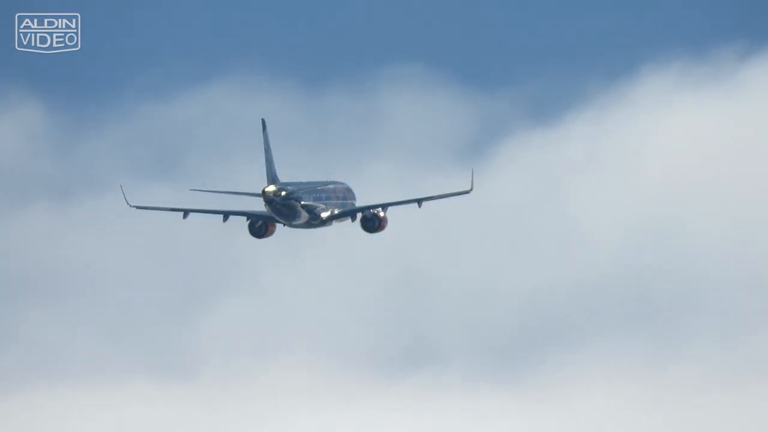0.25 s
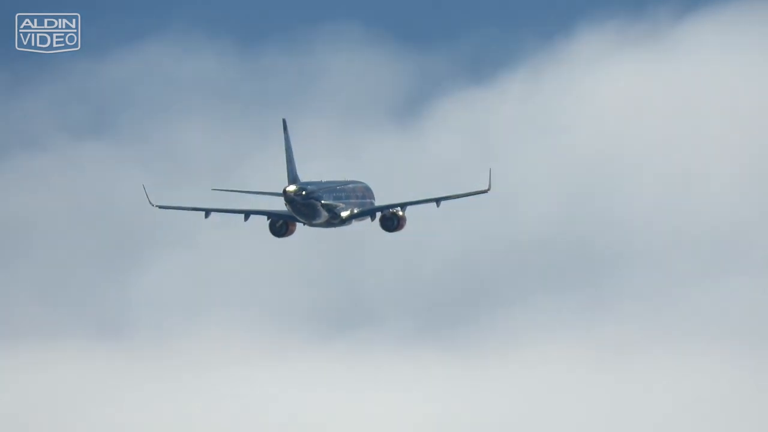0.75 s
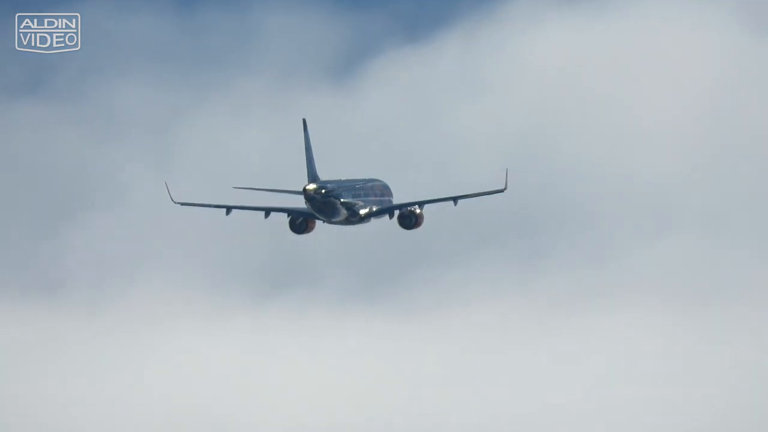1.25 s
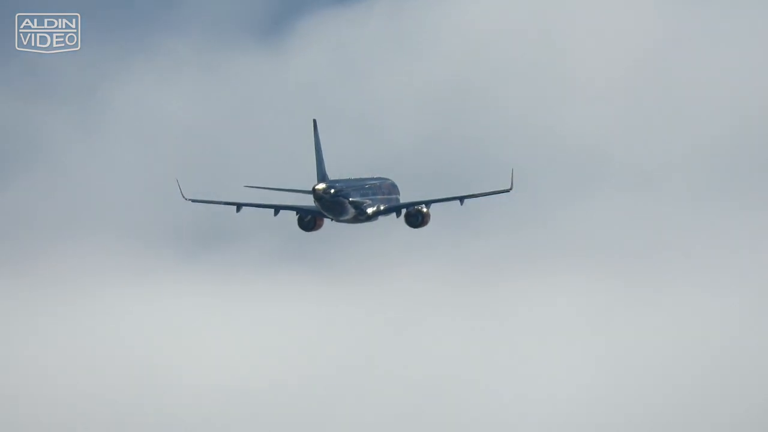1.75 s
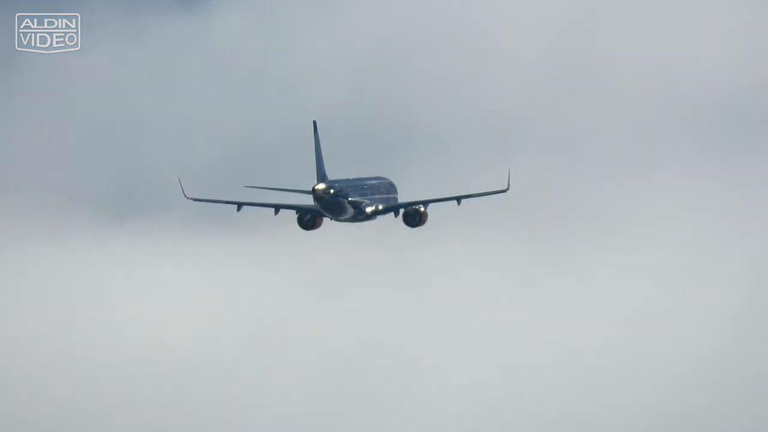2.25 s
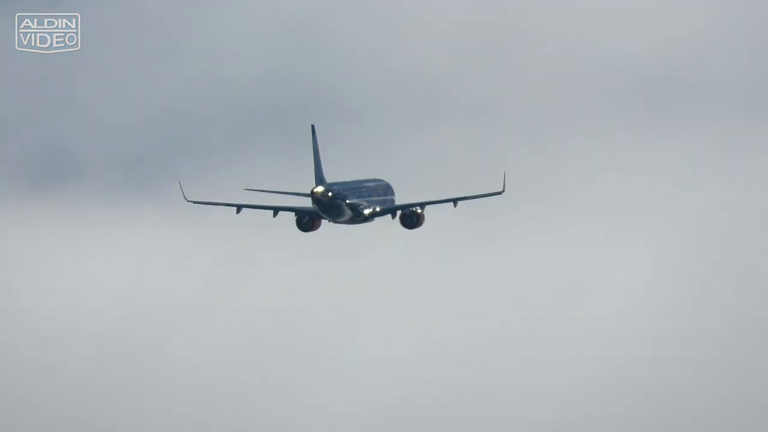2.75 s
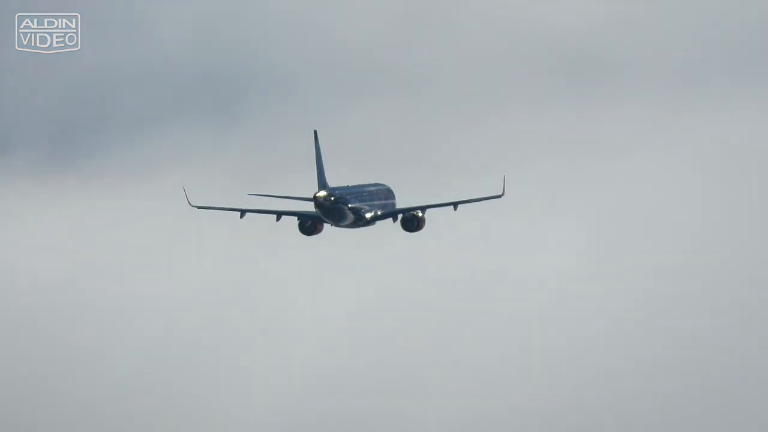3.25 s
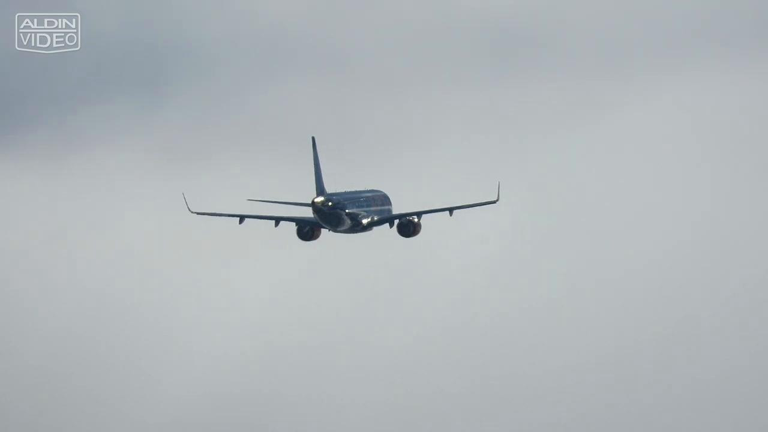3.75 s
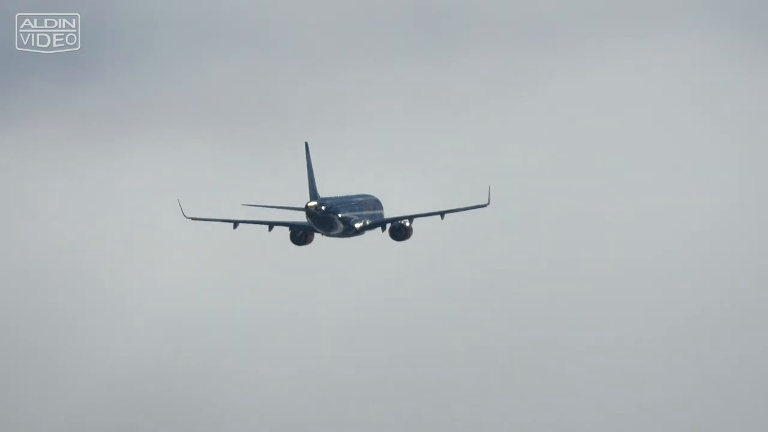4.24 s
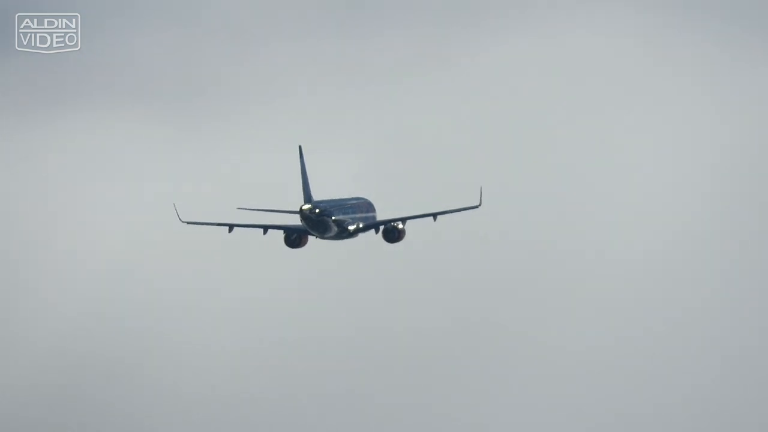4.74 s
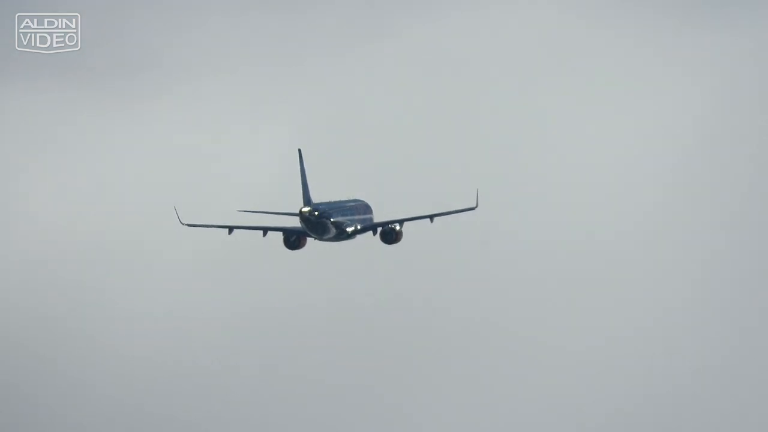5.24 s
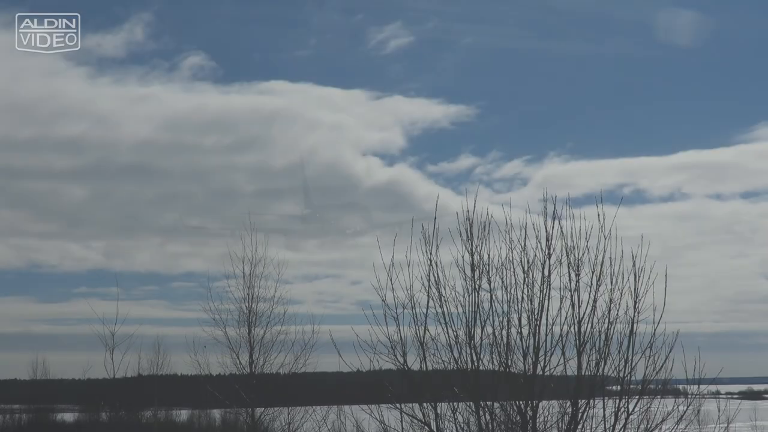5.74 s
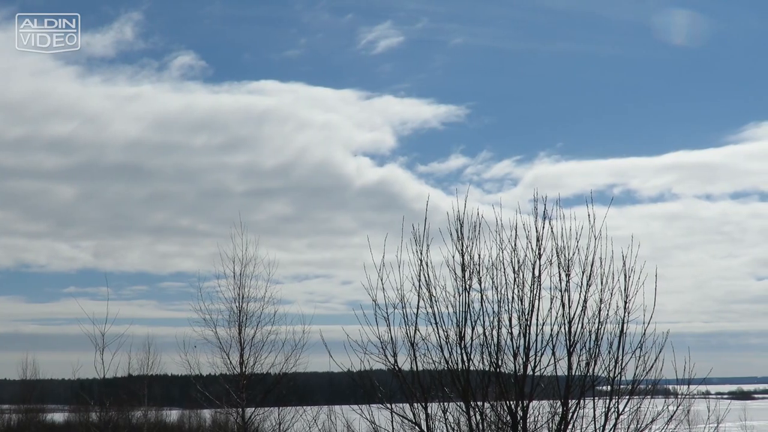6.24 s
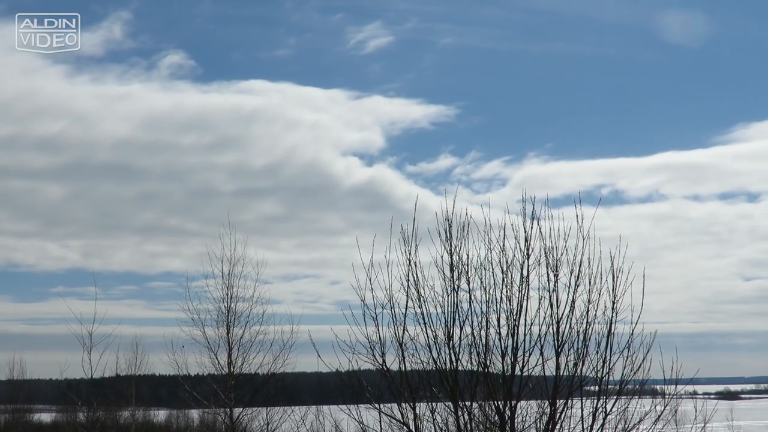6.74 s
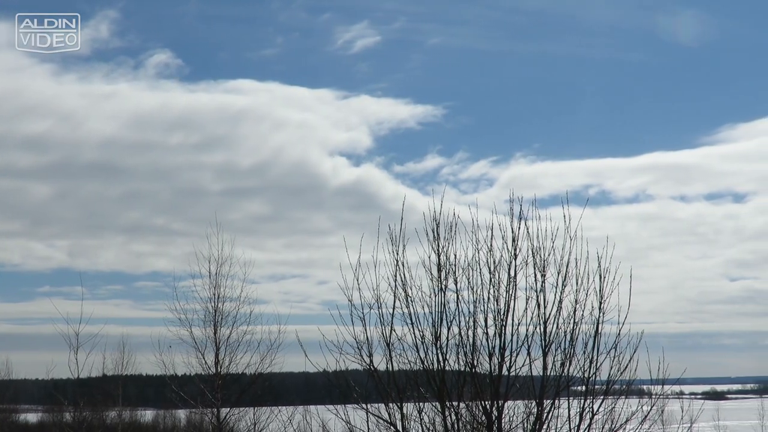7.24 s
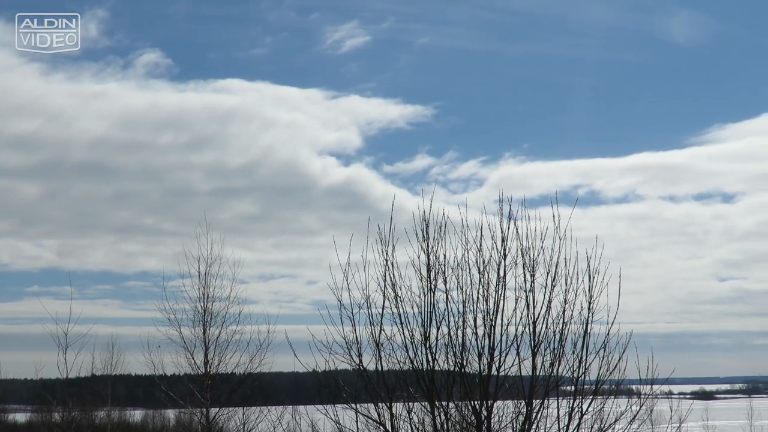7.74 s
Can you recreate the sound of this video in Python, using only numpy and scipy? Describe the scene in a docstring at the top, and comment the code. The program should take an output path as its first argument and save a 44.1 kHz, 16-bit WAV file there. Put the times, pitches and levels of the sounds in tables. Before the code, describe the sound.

A departing jet airliner's low, muffled exhaust roar swells around one second, throbs with a deep hum, then fades unevenly to a duller distant rumble.

```python
"""A jet airliner's exhaust roar swells and fades through restless air as it climbs away outdoors.
Shortly before 6 s the near roar dissolves into a duller, more distant one.
Two close low tones hum and beat within it, over faint whines, a whistle, ticks and microphone hiss.
The roar is shaped noise in three bands, its surges and fan whine are moving bands of noise,
the hum and whistle are wavering sines, and the ticks are short bursts of bright noise."""
import sys
import numpy as np
from scipy import signal
from scipy.fft import rfft, irfft
from scipy.io import wavfile

SR = 44100
rng = np.random.default_rng(int(sys.argv[2]) if len(sys.argv) > 2 else 0)


def waveform_to_disk(signal):
    """Save audio, clipped to [-1, 1], as 16-bit WAV at the path in sys.argv[1]."""
    frames = np.transpose(np.atleast_2d(signal))
    scaled = np.clip(frames, -1, 1) * 32767
    samples = np.round(scaled).astype(np.int16)
    wavfile.write(sys.argv[1], SR, samples)


N = 352359
TIME = np.arange(N) / SR  # s
BINS = np.fft.rfftfreq(N, 1 / SR)  # Hz


def gain_of(db):
    """Decibels to amplitude."""
    return 10 ** (np.asarray(db) / 20)


def evened(x):
    """Scales to rms 1."""
    return x / np.sqrt(np.mean(x ** 2) + 1e-20)


def read(points):
    """Reads a table of (Hz, dB) on every frequency bin, along a logarithmic pitch axis."""
    hz, db = np.transpose(points)
    return np.interp(np.log(BINS + 1), np.log(hz + 1), db)


def curves(rows):
    """Reads each column of a time table on every sample."""
    seconds, *columns = np.transpose(rows)
    return [np.interp(TIME, seconds, column) for column in columns]


def noise(gain):
    """Noise of rms 1 with the given amplitude spectrum."""
    white = rfft(rng.standard_normal(N))
    return evened(irfft(white * gain, N))


def drift(hz):
    """Slow chance movement of rms 1, up to about hz."""
    return noise(np.exp(-(BINS / hz) ** 2))


def slow(hz):
    """Slow chance movement of rms 1, up to about hz, drawn every 5 ms and joined by lines."""
    steps = np.arange(0, N / SR + 0.01, 0.005)
    rates = np.fft.rfftfreq(len(steps), steps[1])
    white = rfft(rng.standard_normal(len(steps)))
    movement = irfft(white * np.exp(-(rates / hz) ** 2), len(steps))
    return np.interp(TIME, steps, evened(movement))


def steadied(x, seconds):
    """Takes the slow swells out of a noise, leaving its fast grain."""
    window = signal.windows.hann(int(seconds * SR))
    energy = signal.fftconvolve(x ** 2, window, "same")
    weight = signal.fftconvolve(np.ones(N), window, "same")  # smaller near the ends
    return x / np.sqrt(np.maximum(energy / weight, 1e-9))


def below(hz, order=8):
    """A soft crossover, falling from 1 to 0 around hz."""
    return 1 / (1 + (BINS / hz) ** order)


def swell(peak_s, rise_s, fall_s):
    """A bell-shaped envelope of height 1."""
    half_s = np.where(TIME < peak_s, rise_s, fall_s)
    return np.exp(-((TIME - peak_s) / half_s) ** 2)


def band(hz, width_hz):
    """An even band of noise whose centre follows hz."""
    turn = np.exp(2j * np.pi * np.cumsum(hz) / SR)
    grain = drift(width_hz / 2) + 1j * drift(width_hz / 2)
    return steadied((grain * turn).real, 0.9)


def wavering(hz, waver_db, wander_turns):
    """One tone of mean pitch hz that wavers a little in strength and pitch."""
    turns = hz * TIME + wander_turns * slow(3.5)
    return np.sqrt(2) * np.sin(2 * np.pi * turns) * gain_of(waver_db * slow(11))


# humps and hollows of the roar, near and far: centre [Hz], width [Hz], height [dB]
ROAR_COLOUR = [(100.4, 6.4, 2.5), (142, 16.5, -6), (190.6, 15, -9.5), (220, 11, 2), (259, 12, 4),
               (374, 49, -0.5), (484, 73, 0.5), (650, 21, -1)]
RUMBLE_FLUTTER_DB = 1.0  # the large eddies arrive in lumps
RASP_FLUTTER_DB = 0.74


def exhaust(spectrum, rumble_db, roar_db, rasp_db, roar_flutter_db):
    """Turbulent mixing noise: large eddies rumble, middle ones roar and small ones rasp."""
    colour_db = sum(db * np.exp(-(2 * (BINS - hz) / width) ** 2) for hz, width, db in ROAR_COLOUR)
    shape = gain_of(read(spectrum) + colour_db)
    shape = shape * below(1950, order=14)  # the air absorbs the treble
    low, high = below(148.0), 1 - below(648)
    middle = (1 - low) * (1 - high)
    # the shares are of power, hence the roots
    rumble = steadied(noise(shape * np.sqrt(low)), 0.18)
    roar = steadied(noise(shape * np.sqrt(middle)), 0.18)
    rasp = steadied(noise(shape * np.sqrt(high)), 0.18)
    flutter = slow(7.8)  # shared by roar and rasp
    rumble = rumble * gain_of(rumble_db + RUMBLE_FLUTTER_DB * slow(30))
    roar = roar * gain_of(roar_db + roar_flutter_db * flutter)
    rasp = rasp * gain_of(rasp_db + RASP_FLUTTER_DB * flutter)
    return rumble + roar + rasp


# strength of the near roar as the jet draws away, before the trims below:
# start_s [s], roar_db [dB], deep rumble_db [dB], upper rasp_db [dB]
NEAR_LEVELS = [(0, -35.5, -33, -43), (0.15, -34.5, -39.5, -45.5), (0.56, -28.5, -36, -40.5),
               (0.78, -26.5, -34.5, -43), (1.05, -27, -35.5, -39), (1.6, -29.5, -35.5, -45),
               (2.1, -31, -37.5, -45.5), (2.65, -31.5, -40, -42), (3.1, -34, -39.0, -46.5),
               (3.6, -36.0, -36.5, -47.0), (4.5, -34, -38.5, -45), (5.0, -34.5, -40, -46),
               (5.5, -35.5, -38.5, -44.5)]
# relative spectrum of the near roar: pitch_hz [Hz], level_db [dB per Hz]
NEAR_SPECTRUM = [(13, -60), (22, -41), (46, -20.5), (75, -9.5), (139, -11.5), (178, -4), (192, 0),
                 (218, -4.5), (311, -7), (361, -13), (505, -10), (609, -18.5), (707, -19.5), (1110, -30.5),
                 (1900, -48.5), (2470, -78), (4180, -120)]
RUMBLE_TRIM_DB, ROAR_TRIM_DB, RASP_TRIM_DB = 0.5, 0.33, 2.28


def near_roar():
    """Exhaust noise that swells, then fades as the jet draws away."""
    roar_db, rumble_db, rasp_db = curves(NEAR_LEVELS)
    return exhaust(NEAR_SPECTRUM, rumble_db + RUMBLE_TRIM_DB, roar_db + ROAR_TRIM_DB,
                   rasp_db + RASP_TRIM_DB, roar_flutter_db=0.64)


# faint electronic tones: pitch_hz [Hz], level_db [dB rms]
STEADY_WHINES = [(4436, -82), (13426, -77)]


def steady_whines():
    """Thin electronic sines of constant level, wandering very slightly in phase."""
    total = np.zeros(N)
    for hz, db in STEADY_WHINES:
        turns = hz * TIME + 0.04 * slow(3)
        total += np.sqrt(2) * gain_of(db) * np.sin(2 * np.pi * turns)
    return total


# relative spectrum of the microphone hiss: pitch_hz [Hz], level_db [dB per Hz]
HISS_SPECTRUM = [(30, -1), (300, 15.5), (1000, 6), (2000, 3), (4000, 0.5), (8000, -1), (15500, -0.5)]
HISS_DB = -50.5  # of each microphone, before they mix


def hiss(opposed=0.046):
    """Self-noise of two microphones; stereo widening feeds a little of each into the other, inverted."""
    pair = np.array([noise(gain_of(read(HISS_SPECTRUM))) for _ in range(2)])
    return gain_of(HISS_DB) * (pair - opposed * pair[::-1])


# swells of a thin whistle, before its waver: peak_s [s], level_db [dB rms], rise_s [s], fall_s [s]
WHISTLE_SWELLS = [(.7, -66.5, 1.3, .8), (5.2, -68.5, 0.79, .6), (7.4, -70, 0.74, 0.8)]
WHISTLE_HZ = 1578


def whistle():
    """One wavering sine that comes and goes."""
    strength = sum(gain_of(db) * swell(s, rise, fall) for s, db, rise, fall in WHISTLE_SWELLS)
    return strength * wavering(WHISTLE_HZ, waver_db=2.5, wander_turns=0.055)


# swells of the low hum, before its waver: peak_s [s], pitch_hz [Hz], level_db [dB rms],
# rise_s [s], fall_s [s], waver_db [dB rms, either sign]
HUM_SWELLS = [(.55, 192, -31.5, 0.3, 0.13, 4), (.57, 178.7, -32.5, 0.36, .16, -1),
              (1.13, 191.8, -26, 0.38, 0.37, 2.6), (1.6, 180.4, -35, .6, 0.69, 2),
              (3.0, 193.1, -33.5, 0.4, 0.74, 1.9), (4.6, 179.5, -42, .45, .5, 7),
              (5.4, 192.5, -36.5, 0.32, 0.35, 2.2), (7.15, 191.4, -38.5, 1.52, 0.41, 0.3),
              (7.95, 191.4, -42, 0.14, .12, -1)]


def hum():
    """Two low tones about 13 Hz apart swell and ebb, throbbing where they overlap."""
    total = np.zeros(N)
    for s, hz, db, rise, fall, waver_db in HUM_SWELLS:
        total += wavering(hz, waver_db, wander_turns=0.067) * gain_of(db) * swell(s, rise, fall)
    return total


# bands that swell out of the roar as the air and the angle change:
# peak_s [s], pitch_hz at the peak [Hz], level_db [dB rms], half_length_s [s], width_hz [Hz]
SURGE_BANDS = [(0.567, 260, -30, 0.13, 150), (1.08, 409.2, -33.5, .25, 233), (2.352, 520, -42, 0.2, 140),
               (2.65, 722, -41, 0.32, 259), (4.552, 290.4, -40, 0.15, 130), (4.598, 547, -48, 0.3, 210),
               (5.1, 300, -40.5, 0.096, 160), (5.5, 429.8, -41, 0.27, 260), (6.7, 265, -46.5, 0.62, 110)]
SURGE_SAG_OCTAVES_PER_S = 0.45


def surges():
    """Bands of noise that swell and pass, each sliding down in pitch."""
    total = np.zeros(N)
    for s, hz, db, half, width in SURGE_BANDS:
        centre_hz = hz * 2 ** (-SURGE_SAG_OCTAVES_PER_S * (TIME - s))
        total += band(centre_hz, width) * gain_of(db) * swell(s, half, half)
    return total


# pitch and level are those at the start, before the sag and the fade
FAN_START_S, FAN_RISE_S, FAN_HZ, FAN_SAG_HZ_PER_S, FAN_WIDTH_HZ = 1.9, 0.22, 1688, 16, 91
FAN_DB, FAN_FADE_DB_PER_S = -66.5, 1


def fans():
    """The blurred fan whine enters as the jet turns its tail, and sinks with the Doppler shift."""
    age = TIME - FAN_START_S
    whine = band(FAN_HZ - FAN_SAG_HZ_PER_S * age, FAN_WIDTH_HZ)
    rise = np.clip(age / FAN_RISE_S, 0, 1)
    return whine * rise * gain_of(FAN_DB - FAN_FADE_DB_PER_S * age)


# tiny ticks and scuffs near the microphone: peak_s [s], half_length_s [s], level_db [dB]
TICK_BURSTS = [(4.04, .001, -54), (4.572, .004, -58), (7.128, 0.012, -57.5)]


def ticks():
    """Short soft bursts of bright noise."""
    envelope = sum(gain_of(db) * np.exp(-((TIME - s) / half) ** 2) for s, half, db in TICK_BURSTS)
    return noise(below(6900, order=4) * (1 - below(1500))) * envelope


DISSOLVE_START_S, DISSOLVE_END_S = 5.56, 5.92
# relative spectrum of the far roar: pitch_hz [Hz], level_db [dB per Hz]
FAR_SPECTRUM = [(13, -72), (22, -28), (59, -14), (124, -14), (156, -11), (174, -6), (193, -25), (207, -4),
                (219, -5.5), (261, -6.5), (311, -9.5), (493, -19), (1500, -58), (1950, -55), (3300, -120)]
# levels at the end of the dissolve, and the fade from there
FAR_ROAR_DB, FAR_RUMBLE_DB, FAR_RASP_DB, FAR_FADE_DB_PER_S = -42, -50, -48.5, 0.05


def far_roar():
    """Duller, more even exhaust noise that sinks slowly."""
    roar = exhaust(FAR_SPECTRUM, FAR_RUMBLE_DB, FAR_ROAR_DB, FAR_RASP_DB, roar_flutter_db=0.0)
    return roar * gain_of(-FAR_FADE_DB_PER_S * (TIME - DISSOLVE_END_S))


def jet():
    """The near roar and fan whine dissolve into the far roar at equal power; surges ride on top."""
    blend = np.clip((TIME - DISSOLVE_START_S) / (DISSOLVE_END_S - DISSOLVE_START_S), 0, 1)
    near = near_roar() + fans()
    return near * np.sqrt(1 - blend) + far_roar() * np.sqrt(blend) + surges()


# stereo lean of the outdoor sound: pitch_hz [Hz], left minus right [dB]
STEREO_LEAN = [(60, 1), (110, 1), (190, 2), (260, 1.5), (380, 1.3), (600, 0), (1500, -0.5)]


def scene():
    """Jet and hum lean left around the hum's pitch; whines, whistle and ticks sit in the centre."""
    outdoors = rfft(jet() + hum())
    lean_db = read(STEREO_LEAN) / 2  # half to each side
    pair = irfft(outdoors * gain_of([lean_db, -lean_db]), N)
    return pair + hiss() + steady_whines() + whistle() + ticks()


EDGE_HZ = 15800


def record(dry):
    """The recorder's band limit: a steep lowpass."""
    lowpass = signal.firwin(1023, EDGE_HZ, window=("kaiser", 8), fs=SR)
    return signal.oaconvolve(dry, lowpass[None], "same", axes=1)


dry = scene()
out = record(dry)
waveform_to_disk(out)
```